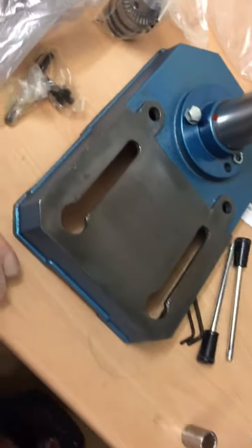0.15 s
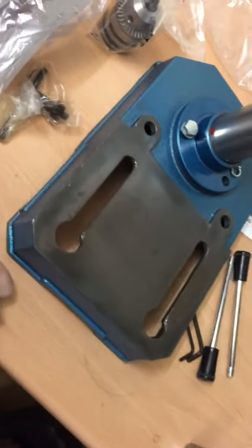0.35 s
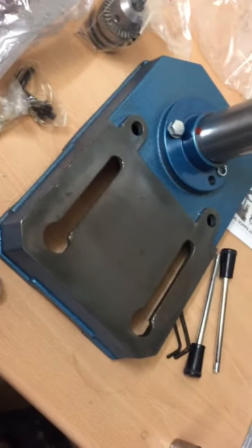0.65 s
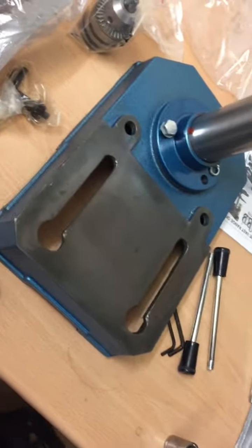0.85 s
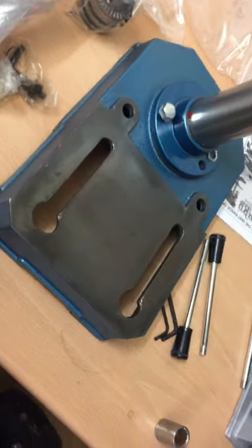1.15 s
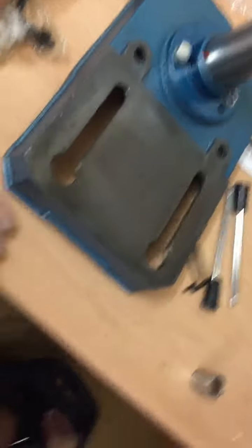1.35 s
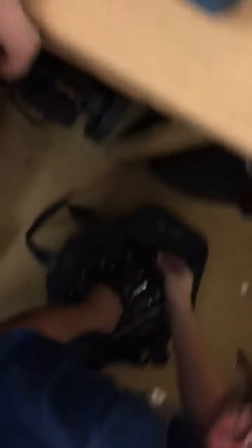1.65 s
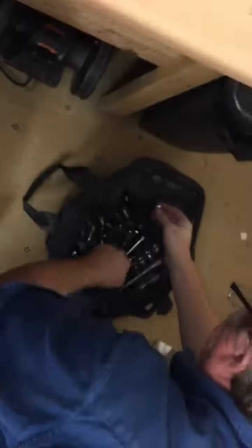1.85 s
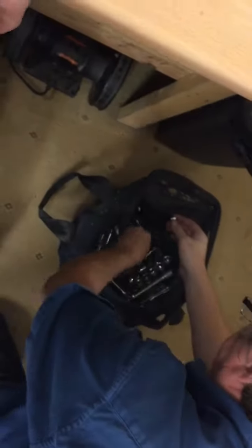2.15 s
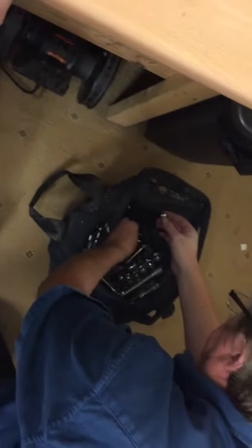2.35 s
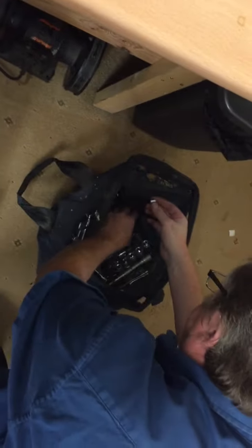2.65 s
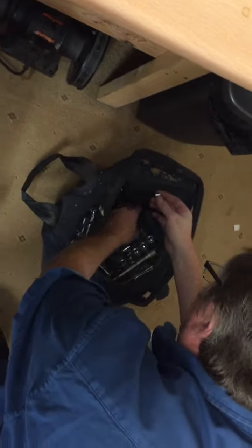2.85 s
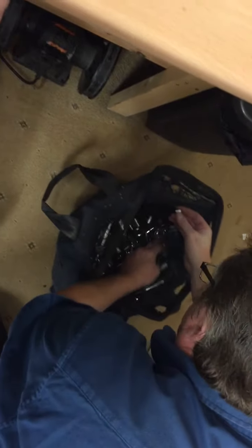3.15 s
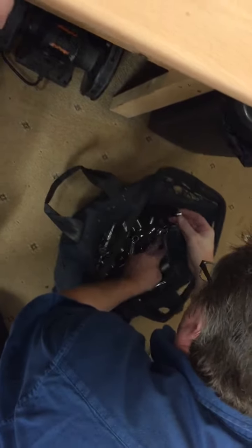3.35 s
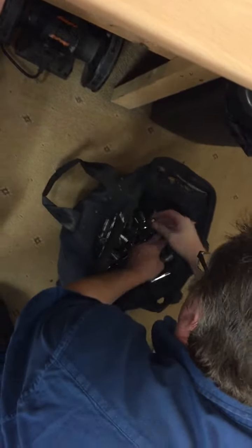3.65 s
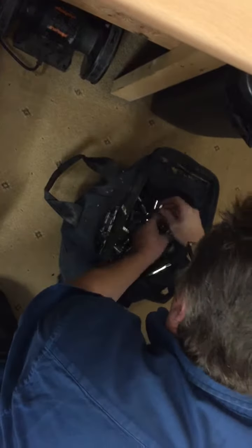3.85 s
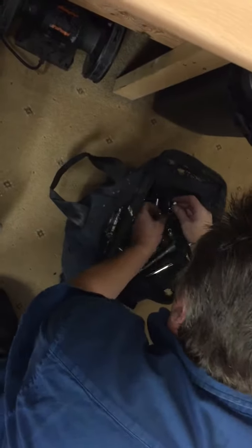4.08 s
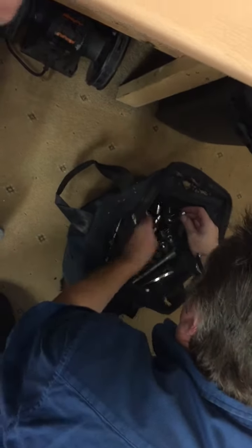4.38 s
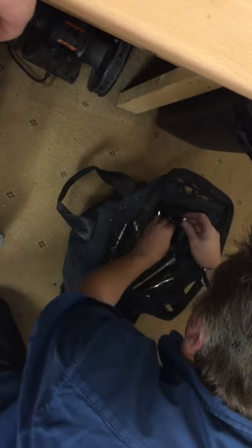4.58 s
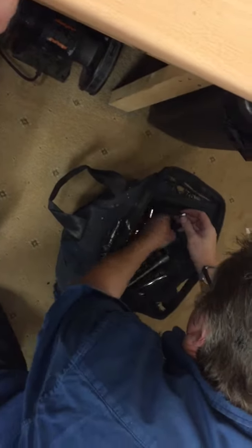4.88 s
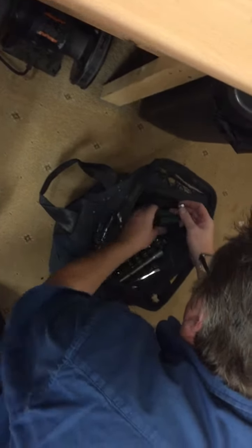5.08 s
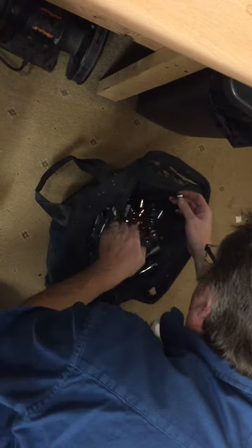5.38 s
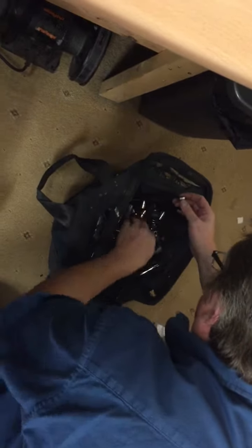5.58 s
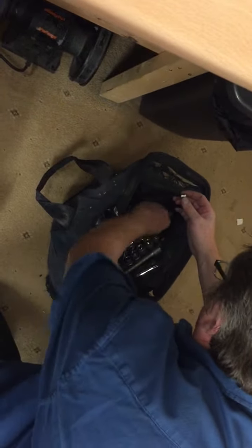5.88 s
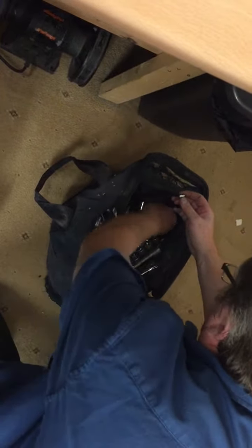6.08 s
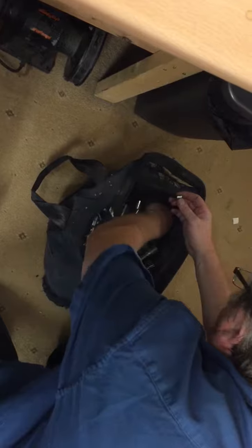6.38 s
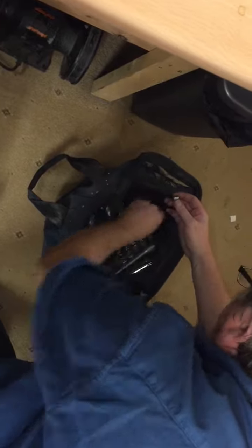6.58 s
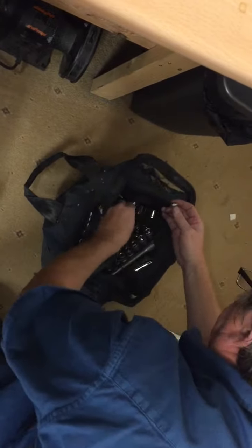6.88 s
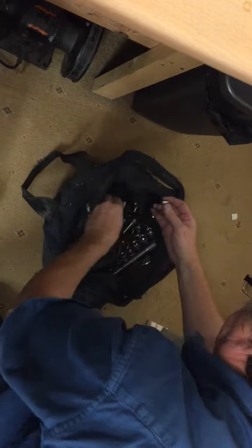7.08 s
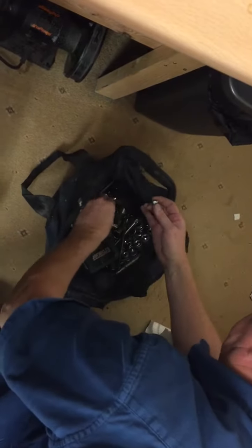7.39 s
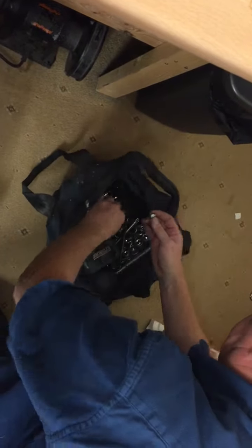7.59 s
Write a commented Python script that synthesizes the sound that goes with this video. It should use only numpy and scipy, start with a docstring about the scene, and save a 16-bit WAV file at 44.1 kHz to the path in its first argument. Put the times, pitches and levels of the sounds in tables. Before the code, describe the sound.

Steel sockets clink, chime and rattle unevenly as hands dig through a cloth tool bag, with soft rustle and one hard knock late on.

```python
"""Clacks, pings and chimes of steel: hands rummage through sockets and tools in a fabric bag on a workshop floor.
Pieces pressed together clack as noise cracks with choked notes; pings and chimes are fluttering sines that die ever faster.
Each push of the hand and each clack swells the filtered jostle of the heap and the rub of the cloth.
Dull knocks and low handling thumps are padded bursts of noise, over still air and a faint mains hum."""
import sys
import numpy as np
from scipy import signal
from scipy.io import wavfile
from scipy.ndimage import uniform_filter1d

SR = 44100
rng = np.random.default_rng(int(sys.argv[2]) if len(sys.argv) > 2 else 0)


def generate_wav(signal):
    """Clip the signal to [-1, 1] and save it as 16-bit WAV at the path in sys.argv[1]."""
    frames = np.transpose(np.atleast_2d(signal))
    scaled = np.clip(frames, -1, 1) * 32767
    pcm = np.round(scaled).astype(np.int16)
    wavfile.write(sys.argv[1], SR, pcm)


N = 340893

# the clacks of steel on steel that stand out, before the trim: t/s, level/dB, treble against that level/dB
CLACKS = [(0.358, -43.5, -0.5), (0.658, -45, 2), (0.854, -41, -6), (0.885, -38, 2), (0.975, -34, 6),
          (1.025, -29, 3), (1.036, -24, 9.5), (1.23, -37, 2), (1.25, -36, 2), (1.375, -37.5, 0),
          (1.509, -38, 6.5), (1.637, -30, 5.5), (1.664, -25.5, 8.5), (1.684, -26.5, 2), (1.69, -25, 7),
          (1.72, -27.5, 5.5), (1.866, -34.5, -1), (1.977, -32.5, -12), (2.266, -36, 1.5), (2.332, -39.5, 4),
          (2.479, -52, 1.5), (2.711, -42.5, -14), (2.735, -42, -1), (2.752, -38.5, 5), (2.841, -43.5, 0),
          (2.956, -42.5, -7), (3.021, -33, -1.5), (3.104, -34.5, -2.5), (3.139, -37, 13), (3.233, -32, -21),
          (3.343, -38.5, 10), (3.545, -47, 0), (3.641, -44.5, -10), (3.744, -46.5, -5.5), (3.821, -43.5, 4),
          (3.846, -38.5, -9), (3.933, -40, -12), (4.048, -50, -4), (4.108, -37, -3.5), (4.202, -36, -4),
          (4.231, -34, 0.5), (4.515, -39.5, -9), (4.547, -27.5, -5), (4.577, -32, -1.5), (4.644, -33, -9),
          (4.76, -42, -18), (4.929, -41, -3), (4.939, -45, -1), (5.077, -39.5, -12), (5.119, -40, -12),
          (5.22, -48, 4), (5.296, -42, 13), (5.387, -46.5, 1), (5.582, -20, -11), (5.598, -32, 11),
          (5.656, -34.5, -9), (5.831, -46, -9), (5.849, -44, -3.5), (5.954, -43.5, -4), (5.976, -44, -39),
          (6.141, -50.5, 4), (6.238, -41.5, -37), (6.3, -38.5, -5.5), (6.316, -40, -22), (6.435, -52.5, 5),
          (6.492, -38, 0), (6.549, -42, -6), (6.607, -40.5, -7), (6.825, -24.5, 0.5), (6.893, -33, 2.5),
          (6.942, -35.5, -2.5), (7.038, -39, -1.5), (7.173, -36.5, -3.5), (7.338, -50, 2.5),
          (7.451, -41, -14), (7.488, -42.5, 3), (7.713, -48.5, -32)]
# the hand pushes through the heap, before the trims: start t/s, length/s, steel level/dB, cloth level/dB
PUSHES = [(0.0, 0.052, -46, -54.5), (0.097, 0.21, -66, -65.5), (0.366, 0.057, -49.5, -59.5),
          (0.485, 0.027, -54.5, -57), (0.611, 0.092, -43.5, -48), (0.858, 0.33, -42.5, -60.5),
          (1.003, 0.058, -33, -53), (1.234, 0.58, -42, -59), (1.643, 0.27, -36, -52.5),
          (1.978, 0.11, -32, -47), (2.119, 0.16, -40.5, -54.5), (2.971, 0.45, -46.5, -64),
          (3.113, 0.12, -40.5, -54.5), (3.83, 0.16, -63, -61), (4.065, 0.033, -51, -58.5),
          (4.576, 0.222, -60.5, -53), (4.868, 0.56, -55, -55.5), (5.229, 0.066, -42.5, -52),
          (5.586, 0.043, -63, -39.5), (6.105, 0.53, -58.5, -65), (6.836, 0.13, -51, -48.5),
          (7.138, 0.13, -51.5, -54.5)]
# the clack level at which the weight of a blow and the stir it causes are set
REFERENCE_DB = -40


def amp(db):
    """Turns decibels into gain."""
    return 10 ** (np.asarray(db) / 20)


def unit(x):
    """Scales a signal to rms 1."""
    return x / np.sqrt(np.mean(x ** 2) + 1e-20)


def read(points, hz):
    """Reads a table on a log-frequency axis."""
    f, value = np.transpose(points)
    return np.interp(np.log(hz + 1), np.log(f + 1), value)


def add(mix, s, sound):
    """Mixes a sound in at time s, cut off at the end of the mix."""
    part = mix[max(round(s * SR), 0):][:len(sound)]
    part += sound[:len(part)]


def colour(x, *spectra, size=2048):
    """Minimum-phase filter with the summed dB spectra, so that attacks stay sharp."""
    hz = abs(np.fft.fftfreq(size, 1 / SR))
    gain_db = sum(read(points, hz) for points in spectra)
    log_gain = np.log(amp(gain_db))
    response = np.exp(np.conj(signal.hilbert(log_gain)))
    taps = np.fft.ifft(response).real
    return signal.oaconvolve(x, taps[:size // 2])[:len(x)]


def uneven_times(start, length, gap_s, size=24):
    """Times from start on, about gap_s apart, until the length is used up."""
    gaps = gap_s * (.5 + rng.random(size))
    after = np.append(0, np.cumsum(gaps))
    return start + after[after <= abs(length)]


def contact(t, crack_s, note_db, note_s, rise_s=0.00057, count=5):
    """One touch of steel on steel: a noise crack and a few notes that the heap chokes at once."""
    hz = np.geomspace(1500, 15000, 200)[rng.integers(0, 200, (count, 1))]
    notes = np.sin(2 * np.pi * hz * t) * np.sqrt(hz / hz.max()) * np.exp(-t / note_s)
    crack = rng.standard_normal(len(t)) * np.exp(-t / crack_s)
    attack = 1 - np.exp(-t / rise_s)
    return (crack + amp(note_db) * notes.mean(0)) * attack


def clacks(rows, bounce_s=0.0068, bounce_db=-9, fall_db=-3, dullness=0.083, heft=0.49, level_db=3, count=3):
    """A hard contact, then ever weaker rebounds; the duller blows carry more bass."""
    # broad colour of a clack: f/Hz, level/dB
    clack_colour = [(40, -13.5), (150, -15.5), (300, -4), (750, -6.5), (1700, 3.5), (3000, 4), (6500, 4.5),
                    (10500, -0.5), (15500, -1)]
    shape_db = 3.5  # sets how widely the broad colour varies from blow to blow
    out, t = np.zeros(N), np.arange(SR // 10) / SR
    for s, db, treble_db in rows:
        # light touches are crisp; heavy ones crack longer and stir their neighbours
        weight = amp(heft * (db - REFERENCE_DB))
        hit = contact(t, crack_s=0.0019 * weight, note_db=6, note_s=0.004)
        delays = np.cumsum(bounce_s * (.5 + rng.random(count)))
        for k, delay in enumerate(delays):
            rebound = contact(t, crack_s=0.0031, note_db=-12.0, note_s=0.02)
            add(hit, delay, weight * amp(bounce_db + k * fall_db) * rebound)
        hit = hit / np.sqrt(np.mean(hit[:SR // 160] ** 2))  # level set by the first 6 ms
        tilt = [(700, -dullness * treble_db), (1900, 0.021), (4500, 0.017), (9500, treble_db)]
        # the broad colour varies at random from blow to blow
        shape = [(hz, shape_db * rng.uniform(-2, 1)) for hz in np.geomspace(1200, 15000, 20)]
        add(out, s, amp(db + level_db) * colour(hit, clack_colour, tilt, shape))
    return out


def loose_clacks():
    """Rows for the lesser clacks of each push: a harder push knocks pieces together harder."""
    per_s, treble_db = 14, 1.5
    level_db, spread_db = -0.5, 3  # against the steel level of the push
    rows = []
    for start, length, push_db, _ in PUSHES:
        for s in uneven_times(start, length, 1 / per_s)[1:]:
            db = push_db + level_db + spread_db * rng.standard_normal()
            rows.append((s, db, treble_db))
    return rows


def ring(hz, db, decay_s, rise_s=.0006, flutter=0.5, choke=1.2, free=0.18, size=90, count=SR // 2):
    """One mode: it flutters as the piece rocks, and dies ever faster as the heap closes on it."""
    t = np.arange(count) / SR
    wobble = rng.standard_normal(len(t))
    wobble = uniform_filter1d(uniform_filter1d(wobble, size), size)
    rocking = 1 + flutter * unit(wobble)
    # free decay is straight in dB, choking bends it down; together 60 dB are lost by 0.84 decay_s
    fade = np.exp(-np.log(1000) * (free * t / decay_s + choke * (t / decay_s) ** 2))
    attack = 1 - np.exp(-t / rise_s)
    return amp(db) * fade * attack * rocking * np.sin(2 * np.pi * (hz * t + rng.random()))


def pings(level_db=-3):
    """Short clear pings of steel, each on one pitch."""
    # the pings that stand out, before the trim: t/s, f/Hz, level/dB, decay scale/s
    ping_notes = [(0.091, 1804, -60, 1), (0.683, 13850, -32, 0.094), (0.973, 9000, -29, 0.05),
                  (1.038, 6470, -5.5, 0.014), (1.118, 9450, -20, 0.062), (1.274, 13400, -22, 0.06),
                  (1.522, 13550, -24, 0.099), (1.663, 6450, -12, 0.038), (1.682, 9470, -7, 0.028),
                  (1.758, 13379, -19.5, 0.29), (1.76, 3530, -29, 0.3), (1.866, 9630, -10.5, 0.051),
                  (1.876, 9000, -19, 0.2), (1.904, 12430, -17, 0.21), (1.98, 2426, -22.5, 0.099),
                  (2.028, 6430, -16, 0.075), (2.077, 9030, -16.5, 0.12), (2.209, 10100, -23, 0.074),
                  (2.443, 6620, -43.5, 0.086), (2.751, 9070, -21.5, 0.13), (3.102, 14940, -25, 0.047),
                  (3.136, 11197, -21, 0.037), (3.146, 9600, -20, 0.083), (4.231, 14100, -31, 0.08),
                  (4.547, 11070, -15.5, 0.07), (4.758, 14360, -32, 0.058), (5.239, 13650, -23, 0.11),
                  (5.297, 13550, -26, 0.23), (5.588, 9140, -19, 0.16), (5.927, 13700, -30.5, 0.026),
                  (5.956, 13710, -32.5, 0.043), (6.185, 13900, -38, 0.054), (6.233, 14100, -32, 0.035),
                  (6.826, 1910, -30.5, 0.18), (6.892, 1843, -25.5, 0.075), (7.25, 4490, -40, 0.093)]
    out = np.zeros(N)
    for s, hz, db, decay_s in ping_notes:
        add(out, s, ring(hz, db + level_db, decay_s))
    return out


def chimes(blows, modes, decay_s=0.18):
    """Each blow lands on another spot and so shares itself differently among the modes."""
    spot_db = 3  # standard deviation of each mode from blow to blow
    out = np.zeros(N)
    for s, db in blows:
        for hz, mode_db in modes:
            spot = spot_db * rng.standard_normal()
            add(out, s, ring(hz, db + mode_db + spot, decay_s, count=SR // 5))
    return out


def tube_chimes():
    """A long thin-walled socket rings on its few high modes when struck."""
    # modes of the tube: f/Hz, level/dB
    tube_modes = [(4522, -20), (8660, -5), (12110, -1), (12250, -7), (13955, -3)]
    # blows on the tube: t/s, level/dB
    tube_blows = [(.010, -31.5), (.886, -36), (1.238, -37), (1.826, -27)]
    return chimes(tube_blows, tube_modes)


def socket_knocks():
    """Sockets knock together, once or in a short run: rows of t/s, level/dB."""
    # single knocks and runs of the sockets: start t/s, length/s, level/dB
    knock_runs = [(1.724, 0.24, -29), (1.981, 0.13, -26), (2.749, 0.02, -35), (3.193, 0.02, -31.5),
                  (3.333, 0.06, -35), (5.587, 0.02, -28.5), (5.655, 0.02, -32)]
    gap_s = 0.045
    return [(s, db) for start, length, db in knock_runs for s in uneven_times(start, length, gap_s)]


def socket_chimes(knocks, level_db):
    """The sockets ring on their many modes at each knock."""
    # modes of the sockets: f/Hz, level/dB
    socket_modes = [(1722, -18), (2411, -13), (3531, -13), (4435, -19), (5361, -15), (5943, -7),
                    (6462, -11), (6680, -15), (8290, -14), (9018, -3), (9452, -8), (10050, -8),
                    (10938, -18), (12495, -4), (13368, -6), (14233, -17), (14880, -6), (15566, -12)]
    return amp(level_db) * chimes(knocks, socket_modes)


def socket_ticks(knocks):
    """Rows for the small clack of steel that starts each knock."""
    level_db, treble_db = -17, 1  # level against the knock
    return [(s, db + level_db, treble_db) for s, db in knocks]


def movement(pushes, stir_db, stir_slope):
    """Gain over time: a push swells, holds and dies away; after each clack the heap settles."""
    attack_s, release_s, settle_s = 0.0042, 0.037, 0.04
    power, t = np.zeros(N), np.arange(SR) / SR
    swell = np.minimum(t / attack_s, 1)
    for start, length, db in pushes:
        shape = swell * np.exp(-np.maximum(t - length, 0) / release_s)
        add(power, start, (amp(db) * shape) ** 2)
    settling = swell * np.exp(-t / settle_s)
    for s, db, _ in CLACKS:
        stir = amp(stir_db + stir_slope * (db - REFERENCE_DB))
        add(power, s, (stir * settling) ** 2)
    return np.sqrt(power)


def jostle(per_s=170, spread_db=4.5, grit_db=-7, count=32):
    """Many small pieces touch at random, each with its own notes, over a fine grit."""
    t = np.arange(SR // 25) / SR
    sizes = amp(spread_db * np.minimum(rng.exponential(1, N), 3)) * (rng.random(N) < per_s / SR)
    piece, touches = rng.integers(0, count, N), np.zeros(N)
    pieces = [contact(t, crack_s=0.0023, note_db=-0.5, note_s=0.018) for _ in range(count)]
    for at in np.flatnonzero(sizes):
        add(touches, at / SR, sizes[at] * pieces[piece[at]])
    return unit(touches) + amp(grit_db) * rng.standard_normal(N)


def grains(per_s, spread_db, decay_s, smooth):
    """Noise of mean power near 1, made of many tiny slips of uneven size over a smooth rub."""
    sizes = amp(spread_db * np.minimum(rng.exponential(1, N), 3.5)) * (rng.random(N) < per_s / SR)
    fade = np.exp(-2 / (decay_s * SR))  # power fades twice as fast as amplitude
    power = signal.lfilter([1], [1, -fade], sizes ** 2)
    return rng.standard_normal(N) * np.sqrt(power / power.mean() + abs(smooth))


def tinkles(shifting):
    """Tiny bits and small sockets ring briefly at random, as loudly as the steel around them shifts."""
    # kinds of loose piece: lowest f/Hz, highest f/Hz, rate/(1/s), level against the shifting gain/dB, decay scale/s
    stray_notes = [(13320, 14900, 6.2, 5.5, 0.061), (3981, 15000, 4.9, 3, 0.04)]
    out = np.zeros(N)
    for low_hz, high_hz, per_s, db, decay_s in stray_notes:
        chance, pitch = rng.random((2, N))
        for at in np.flatnonzero(chance < per_s / SR):
            hz = low_hz + (high_hz - low_hz) * pitch[at]
            add(out, at / SR, shifting[at] * ring(hz, db, decay_s, count=SR // 12))
    return out


def heap(steel_db=-2, cloth_db=-1, idle_db=-70):
    """Steel shifts and cloth rubs as the hands push through; the steel is never quite still."""
    # colour of the shifting steel: f/Hz, level/dB
    steel_colour = [(200, -24.5), (900, -17), (1700, -2), (4000, -0.5), (7000, -6.5), (11000, -15),
                    (15500, -22)]
    # colour of the rubbing cloth: f/Hz, level/dB
    cloth_colour = [(20, -28), (40, -4.5), (150, -8.5), (270, 3), (600, -10.5), (1100, -5), (2500, -18),
                    (8000, -35)]
    # stir after a clack, before the trims: dB at the reference clack, dB more per dB of clack
    stir_steel, stir_cloth = (-56, 0.7), (-63.5, 1)
    shifting = movement([(s, length, db) for s, length, db, _ in PUSHES], *stir_steel) + amp(idle_db)
    dragging = movement([(s, length, db) for s, length, _, db in PUSHES], *stir_cloth)
    steel = unit(colour(jostle(), steel_colour)) * shifting * amp(steel_db)
    rub = grains(per_s=26, spread_db=1.0, decay_s=0.047, smooth=0.086)
    cloth = unit(colour(rub, cloth_colour)) * dragging * amp(cloth_db)
    return steel + cloth + tinkles(shifting)


def thumps(rows, decay_s=0.012, level_db=3):
    """Dull, padded bursts of decaying noise; each reaches up to a highest strong pitch of its own."""
    # colour of a thump whose highest strong pitch is 1000 Hz: f/Hz, level/dB
    thump_colour = [(50, -7.5), (180, -28), (330, -3), (600, -3), (1000, -2), (1400, -15.5), (3000, -27)]
    out, t = np.zeros(N), np.arange(SR // 6) / SR
    for s, db, hz in rows:
        shape = [(f * hz / 1000, gain_db) for f, gain_db in thump_colour]
        thud = colour(rng.standard_normal(len(t)) * np.exp(-t / decay_s), shape)
        early_rms = np.sqrt(np.mean(thud[:SR // 80] ** 2))
        add(out, s, amp(db + level_db) * thud / early_rms)
    return out


def main_thumps():
    """Dull knocks and low handling thumps."""
    # the dull knocks and thumps, before the trim: t/s, level/dB, highest strong f/Hz
    thump_rows = [(.12, -55.5, 220), (.37, -53.5, 74.5), (1.7, -43.5, 280), (3.102, -36, 1240),
                  (3.232, -43, 1170), (3.239, -44.5, 950), (4.317, -49, 740), (4.339, -46, 882),
                  (4.546, -49, 1263), (4.685, -40, 770), (4.762, -48.5, 710), (5.08, -50.5, 750),
                  (5.248, -45, 843), (5.293, -42.5, 925), (5.476, -49, 1010), (5.584, -25, 1825),
                  (5.597, -30.5, 1230), (5.655, -38, 1720), (6.215, -58, 636), (6.712, -68, 100),
                  (6.826, -51, 1390), (6.944, -52, 328), (7.19, -56.5, 300)]
    return thumps(thump_rows)


def nudges():
    """Rows for the lesser dull knocks during each push of the bag."""
    per_s, level_db, top_hz = 18, -6, 720  # level against the cloth level of the push
    return [(s, db + level_db, top_hz)
            for start, length, _, db in PUSHES for s in uneven_times(start, length, 1 / per_s)[1:]]


def room(x, build_s=0.003):
    """Sparse random reflections of a small workshop; the treble dies sooner than the bass."""
    # reverberation time, 60 dB down: f/Hz, t60/s
    room_t60 = [(200, 0.27), (1500, 0.18), (6000, 0.073), (15000, 0.12)]
    taps = rng.choice([-1., 1.], SR // 2) * (rng.random(SR // 2) < 3000 / SR)
    hz, t, z = signal.stft(taps, SR, nperseg=256)
    decay = np.exp(-np.log(1000) * t / read(room_t60, hz)[:, None])
    tail = signal.istft(z * decay, SR, nperseg=256)[1]
    tail *= 1 - np.exp(-np.arange(len(tail)) / SR / build_s)
    return signal.oaconvolve(x, tail / np.linalg.norm(tail))[:N]


def background(air_db=-62, hum_db=-68, hum_hz=100.5):
    """Still air as coloured noise, and a faint mains hum as one sine."""
    # colour of the still air: f/Hz, level/dB
    air_colour = [(20, -27), (40, -8), (62, -2), (80, -10.5), (105, 5.5), (140, -17), (300, -18.5),
                  (700, -24), (2000, -22), (7000, -44), (16000, -49.5)]
    air = unit(colour(rng.standard_normal(N), air_colour, size=8192))
    hum = unit(np.sin(2 * np.pi * hum_hz * np.arange(N) / SR))
    return amp(air_db) * air + amp(hum_db) * hum


def scene(hit_room_db=-8, ring_room_db=-14, socket_db=-1):
    """Mixes hits, rings and rustle with the air; hits and rings also excite the room."""
    knocks = socket_knocks()
    hits = clacks(CLACKS) + clacks(socket_ticks(knocks) + loose_clacks())
    hits = hits + main_thumps() + thumps(nudges())
    rings = pings() + tube_chimes() + socket_chimes(knocks, socket_db)
    rustle = heap()
    wet = room(amp(hit_room_db) * hits + amp(ring_room_db) * rings)
    return (hits + rings + rustle + wet + background())[None]


def record(dry, low_cut_hz=41, edge_hz=16000):
    """Cuts the deepest bass and limits the band at the top."""
    bass_cut = signal.butter(4, low_cut_hz, "highpass", fs=SR, output="sos")
    thinned = signal.sosfilt(bass_cut, dry)
    taps = signal.firwin(255, edge_hz, window=("kaiser", 8), fs=SR)
    return signal.oaconvolve(thinned, taps[None], "same")


dry = scene()
out = record(dry)
generate_wav(out)
```